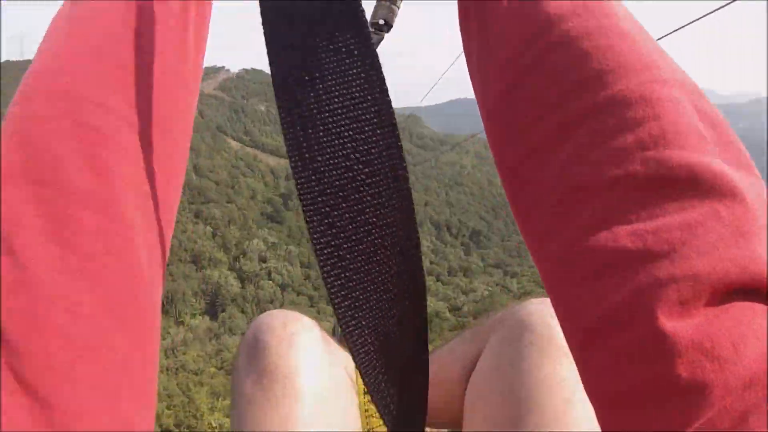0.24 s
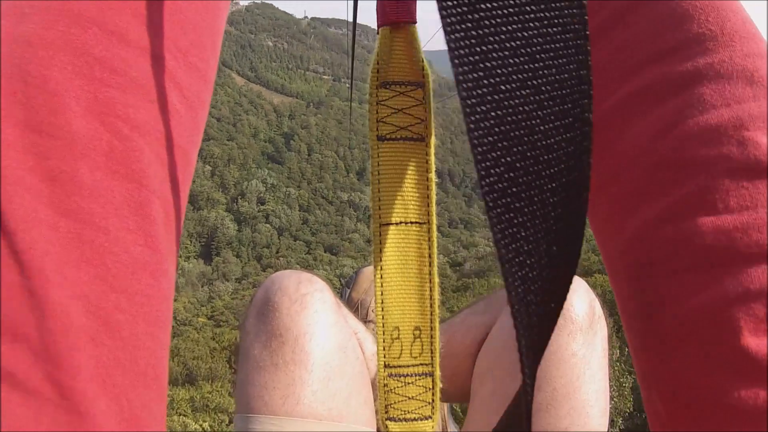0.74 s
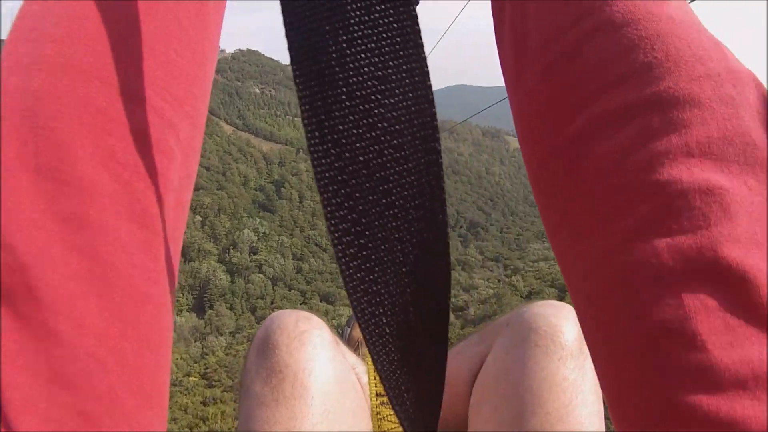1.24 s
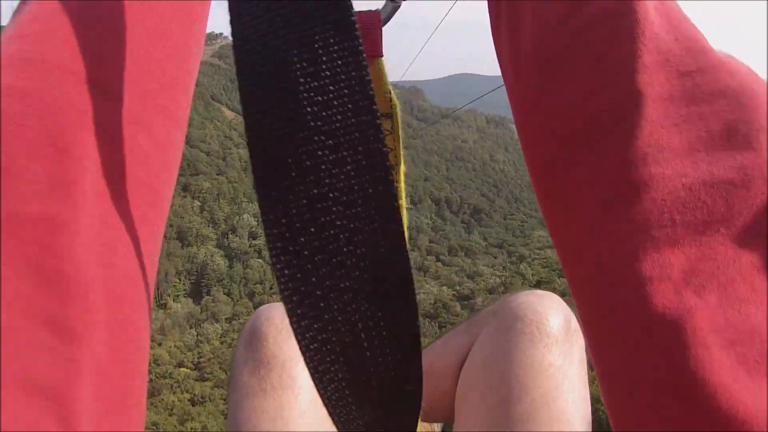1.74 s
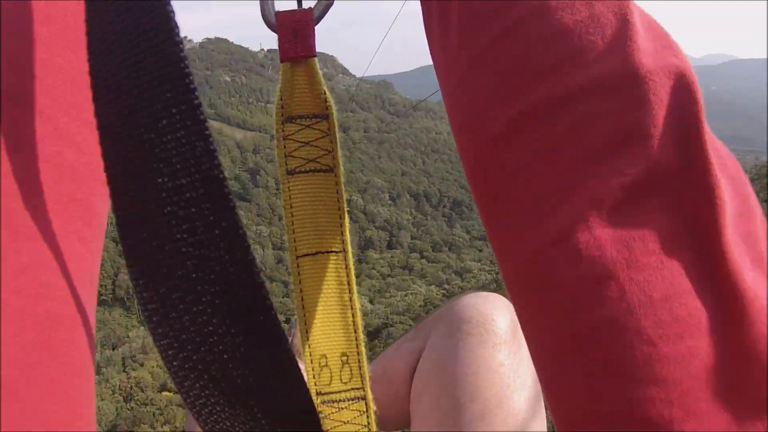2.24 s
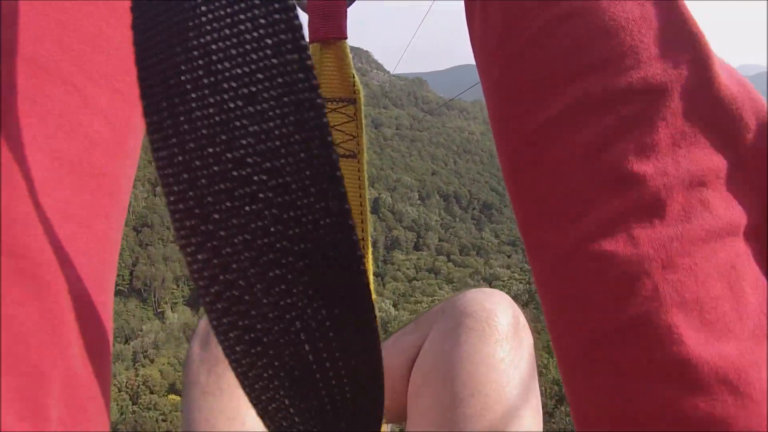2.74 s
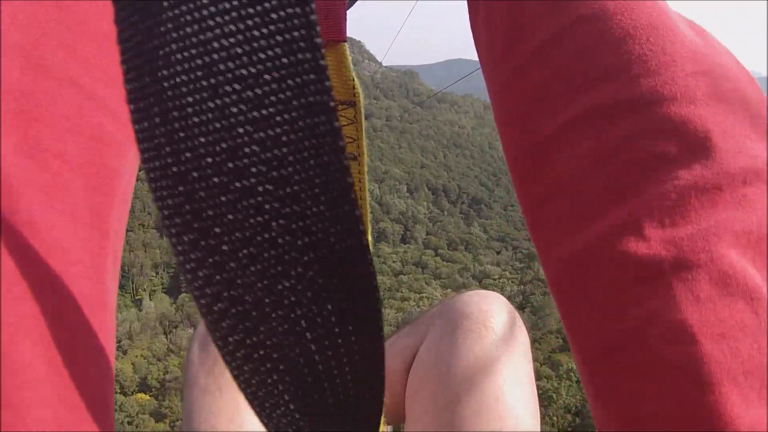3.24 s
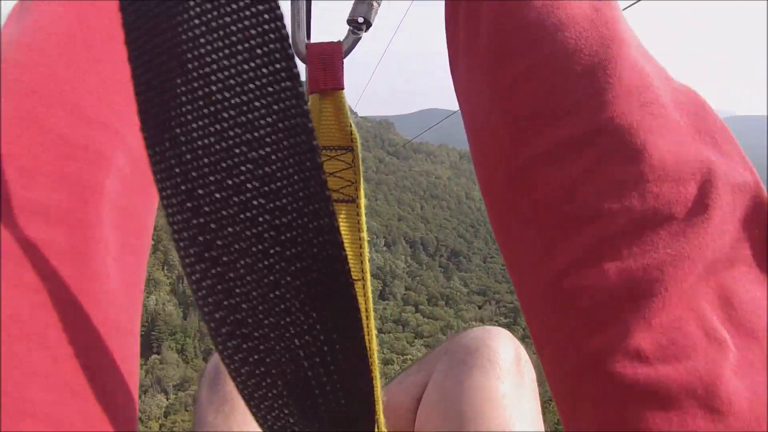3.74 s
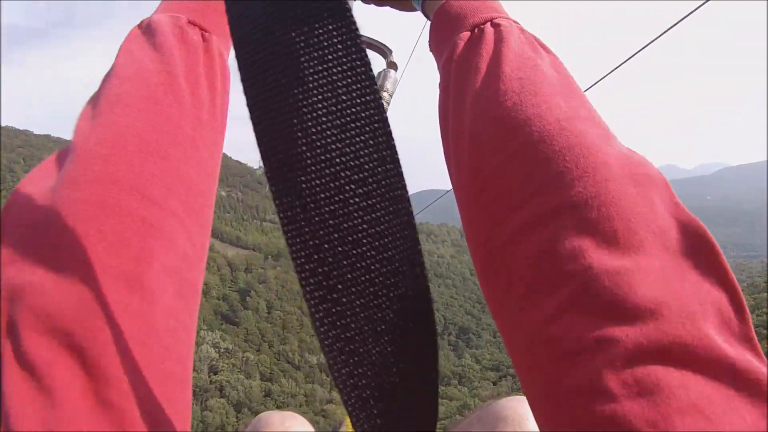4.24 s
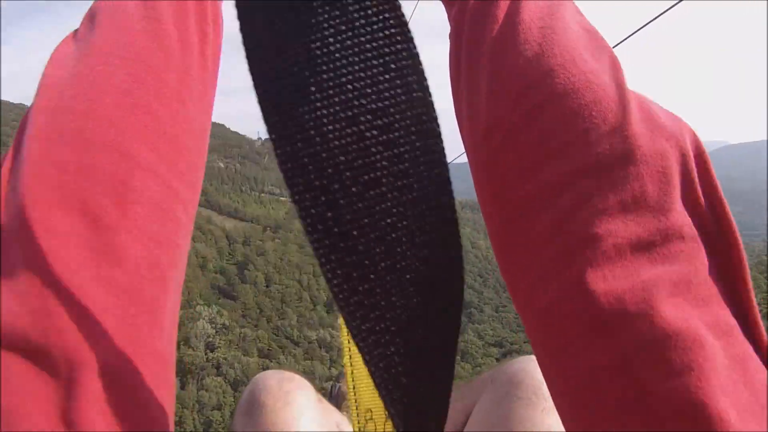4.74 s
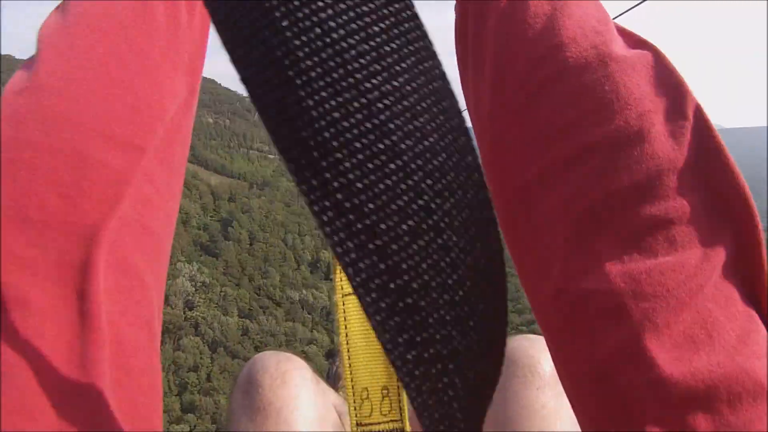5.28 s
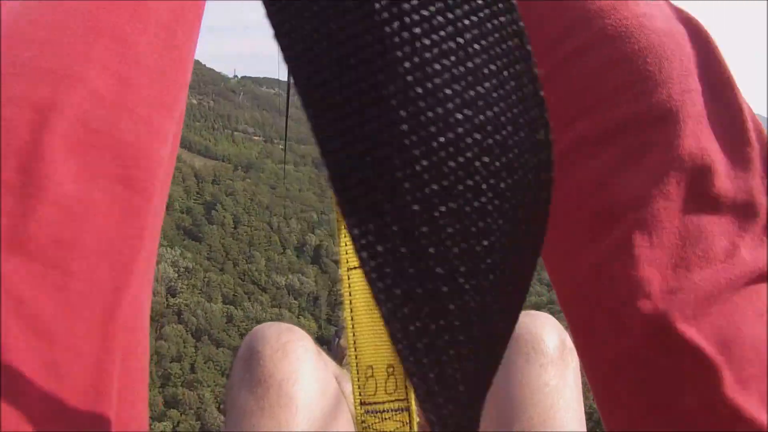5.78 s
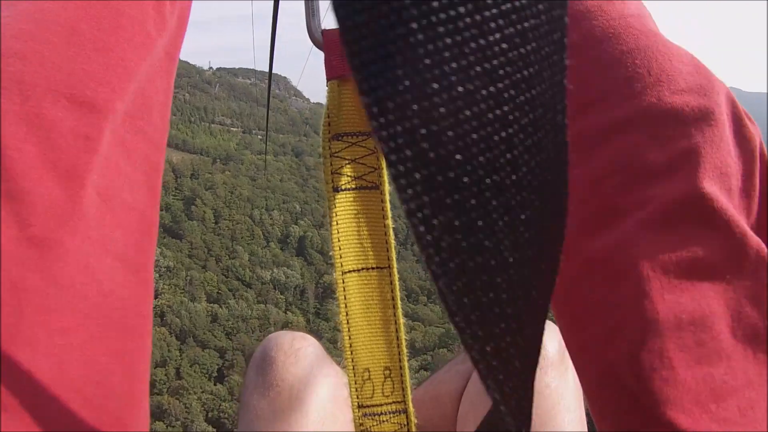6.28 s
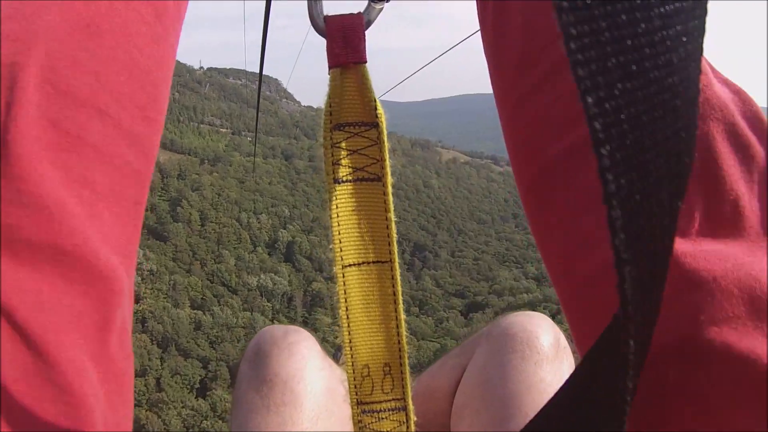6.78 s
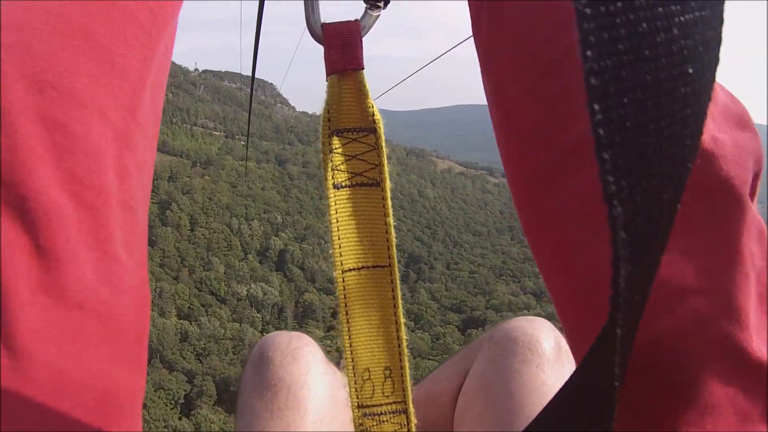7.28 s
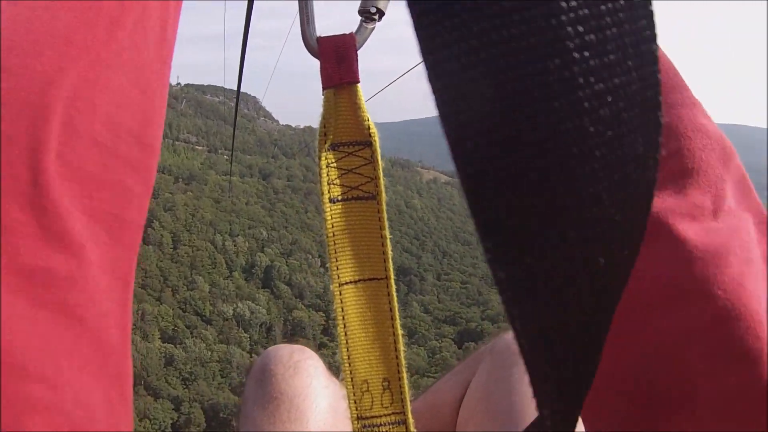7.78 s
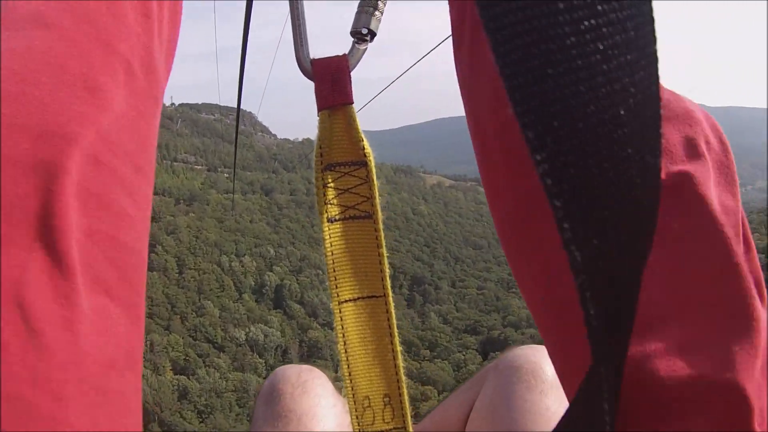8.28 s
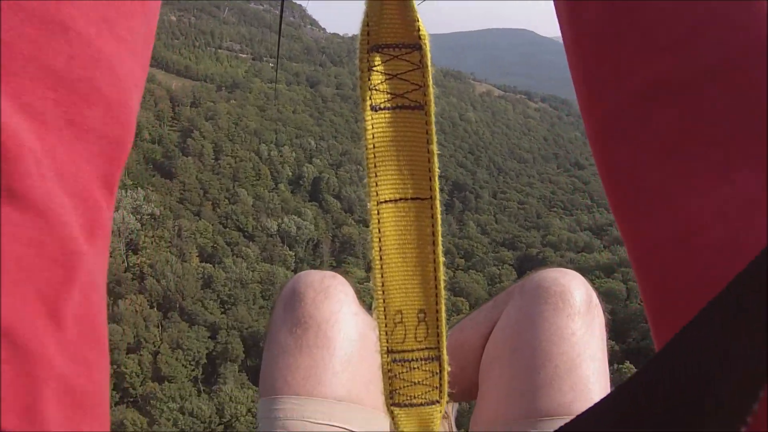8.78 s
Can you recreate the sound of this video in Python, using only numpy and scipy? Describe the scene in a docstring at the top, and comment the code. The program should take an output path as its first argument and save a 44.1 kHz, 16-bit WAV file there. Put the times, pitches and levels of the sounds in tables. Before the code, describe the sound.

Close to the rider, a zipline trolley runs down a stranded steel cable in open air. A rough metallic whine climbs smoothly as it gains speed, wrapped in bright, gritty wheel hiss. Wind begins faintly, then builds into low thumps, rushing air and brief hollow hoots on the microphone. The ride continues to the end without stopping.

```python
"""Zipline ride

A zipline trolley gathers speed down a stranded steel cable, heard in mono by a microphone on the rider.
The wheels drum over the strands, sines whose pitch follows the speed: a rising whine.
They also grind on the wires, noise and fuzzy tones that ring the trolley's fixed resonances.
The headwind, coloured noise on one strength curve, buffets the microphone and hoots in a hollow."""
import sys
import numpy as np
from scipy.fft import rfft, irfft, next_fast_len
from scipy.io import wavfile
from scipy.ndimage import map_coordinates

SR = 44100
rng = np.random.default_rng(int(sys.argv[2]) if len(sys.argv) > 2 else 0)


def output_pcm(signal):
    """Save a mono or channel-first signal as 16-bit PCM at the path in sys.argv[1].

    Samples are clipped to [-1, 1] before scaling.
    """
    pcm = np.clip(np.atleast_2d(signal).T, -1, 1) * 32767
    wavfile.write(sys.argv[1], SR, np.round(pcm).astype(np.int16))


N = 397782
STRANDS_PER_TURN = 6

# In all resonance tables the width is taken at half amplitude, and levels weigh the resonances.
# Resonances of the trolley frame. Each row: centre in Hz, width in Hz, level in dB.
FRAME = [(1606.5, 91, -8), (1670, 61, -6), (1791, 103, -5), (1895, 114, -1.5), (2097, 110, -22),
         (2424, 157, -20.5), (2863, 254, -21.5), (3114, 240, -23.5)]
# Resonances of the wheels. Each row: centre in Hz, width in Hz, level in dB.
WHEELS = [(3903, 114, -6.5), (4050, 210, -7), (4240, 230, -9), (4560, 215, -6), (4920, 290, -2),
          (5205, 250, -7.5)]
# Resonances of the wheel rims. Each row: centre in Hz, width in Hz, level in dB.
RIMS = [(5710, 200, -6), (5920, 160, -8), (6268, 300, -1.5), (6470, 200, -5.5)]
# Resonances of the wire contact. Each row: centre in Hz, width in Hz, level in dB.
CONTACT = [(7064, 330, 3), (7410, 460, 1), (7930, 520, -8), (8240, 290, -12)]


def amp(db):
    """Decibels to gain."""
    return 10 ** (np.asarray(db) / 20)


def unit(x):
    """Scale to rms 1."""
    return x / np.sqrt(np.mean(x ** 2) + 1e-20)


def curve(rows):
    """Straight lines through (seconds, value) rows, one value per sample."""
    s, values = np.transpose(rows)
    return np.interp(np.arange(N) / SR, s, values)


def swells(rows):
    """The dB curve of bell-shaped swells (centre s, half length s to 1/e of the dB, peak dB)."""
    t = np.arange(N) / SR
    return sum(db * np.exp(-((t - s) / length) ** 2) for s, length, db in rows)


def follow(control_db, grows):
    """A level that swings grows times as far as its control, about the same mean."""
    mean_db = control_db.mean()
    return mean_db + grows * (control_db - mean_db)


def wobble(rate):
    """A smooth random curve, rate knots a second."""
    knots = rng.standard_normal(int(N * rate / SR) + 4)
    return map_coordinates(knots, [np.arange(N) * rate / SR])


def filtered(x, response):
    """x times a response of frequency, padded so that the filter's tail does not wrap round."""
    m = next_fast_len(N + SR // 2)
    spectrum = rfft(x, m) * response(np.fft.rfftfreq(m, 1 / SR))
    return irfft(spectrum, m)[..., :N]


def slope(points):
    """The response through (Hz, dB) points on a log axis."""
    f, db = np.transpose(points)
    return lambda hz: amp(np.interp(np.log(hz + 1), np.log(f + 1), db))


def body(modes):
    """The response of steep-sided resonances whose powers add."""
    def response(hz):
        power = 0
        for centre, width, db in modes:
            power = power + (amp(db) / (1 + (2 * (hz - centre) / width) ** 2)) ** 2
        return np.sqrt(power)
    return response


def noise(response):
    """Noise of rms 1 with the given colour."""
    return unit(filtered(rng.standard_normal(N), response))


def tone(cycles, blur, blur_rate, flutter_db):
    """A sine of rms 1 whose phase and strength wander with the uneven lay of the cable."""
    phase = 2 * np.pi * cycles + blur * wobble(blur_rate)
    return unit(amp(flutter_db * wobble(14)) * np.sin(phase))


def steadiness():
    """A gain of 1 that sags for an instant at each lull, when the hiss thins."""
    # Each row: centre in seconds, full depth in dB; the layers take it in different measure.
    lulls = [(1.265, -11), (1.76, -9), (2.543, -12), (3.887, -11), (4.228, -14), (4.466, -12), (4.569, -16),
             (4.634, -15), (4.719, -16), (4.804, -15), (5.231, -14), (7.17, -13), (7.3, -9), (8.706, -9)]
    half_length_s = 0.0085
    return amp(swells([(s, half_length_s, db) for s, db in lulls]))


def buffeting(wind_db, gust_db, eddies):
    """Low thumps as eddies hit the microphone."""
    # Colour of the thumps. Each row: frequency in Hz, relative level in dB per Hz.
    buffet_colour = [(10, -36), (25, -14), (38, 1), (50, 2.5), (70, -1.5), (100, -8), (150, -17.5),
                     (300, -42), (600, -90)]
    level_db = follow(wind_db, grows=0.82) + 3.5 + gust_db + 0.81 * eddies
    return amp(level_db) * noise(slope(buffet_colour))


def air_rush(wind_db, gust_db, eddies):
    """Turbulent air rushes around the microphone, with a quicker flutter of its own."""
    # Colour of the rush. Each row: frequency in Hz, relative level in dB per Hz.
    rush_colour = [(50, -27), (110, -0.5), (150, 2), (220, -1), (330, -7), (500, -6), (650, -17.5),
                   (950, -13), (1200, -11.5), (2000, -7), (4000, -52), (15000, -53)]
    level_db = follow(wind_db, grows=1.0) - 0.05 + 0.22 * gust_db
    return amp(level_db + 0.88 * eddies + 1.24 * wobble(70)) * noise(slope(rush_colour))


def hollow_hoot(wind_db, eddies):
    """Wind blowing across a hollow sounds its resonance in short puffs, louder faster than the wind."""
    # The hollow's resonances. Each row: centre in Hz, width in Hz, level in dB.
    hollow = [(793, 59, 3), (801, 308, -8)]
    # Swells and fades as the wind's angle on the hollow changes.
    # Each row: centre in seconds, half length in seconds, change in dB.
    hoot_swells = [(2.15, 0.34, 4), (4.05, 0.14, 2.5), (4.45, 0.15, -6), (5.35, 0.6, -6.5), (6.1, 0.2, 3.0),
                   (8.25, 0.35, 1)]
    level_db = follow(wind_db, grows=1.36) + 1.5 + swells(hoot_swells)
    return amp(level_db + 1.4 * eddies + 1.8 * wobble(50)) * noise(body(hollow))


def wind(steady):
    """One wind strength and one set of eddies drive the buffeting, the rush and the hoot."""
    # Strength of the headwind, before each layer's own offset. Each row: time in seconds, strength in dB.
    strength = [(0.0, -49.5), (0.4, -54), (0.6, -45.5), (2.6, -32.5), (2.8, -34.5), (3.6, -32.0),
                (3.8, -36), (4.8, -37), (5.0, -34), (5.8, -29.5), (6.6, -36), (7.0, -30), (7.6, -34.5),
                (8.0, -32.0), (8.2, -35.5), (9.0, -30.5)]
    # Gusts and slack spells at the microphone, in full on the buffeting and in part on the rush.
    # Each row: centre in seconds, half length in seconds, change in dB.
    gusts = [(1.35, 0.25, 4.0), (3.45, 0.22, -4), (4.95, 0.17, 2.5), (8.75, 0.34, 6)]
    wind_db, gust_db, eddies = curve(strength), swells(gusts), wobble(22)
    buffet = buffeting(wind_db, gust_db, eddies)
    rush = steady * air_rush(wind_db, gust_db, eddies)
    hoot = np.sqrt(steady) * hollow_hoot(wind_db, eddies)
    return buffet + rush + hoot


def frame_ring():
    """The rough steel contact rings the trolley frame."""
    # Level of the ring, before its offset. Each row: time in seconds, level in dB.
    ring_level = [(0.0, -24.5), (1.0, -23.5), (2.2, -26), (2.6, -24.5), (4.2, -26.5), (4.6, -30),
                  (5.4, -26), (7.0, -23.0), (7.2, -27.5), (7.8, -24), (8.0, -25), (8.2, -24), (9.0, -24)]
    return amp(curve(ring_level) + 6.5 + 0.34 * wobble(14)) * noise(body(FRAME))


def wheel_hiss(grind_db, rub_db):
    """The contact excites the wheels, and their rims ring harder when the cable rubs against them."""
    # Level of the wheels' hiss, before its offset. Each row: time in seconds, level in dB.
    hiss_level = [(0.0, -19), (0.8, -22.0), (1.4, -20), (1.8, -23.0), (2.6, -22.5), (3.8, -25.0),
                  (4.2, -22), (5.2, -23.5), (6.0, -23.0), (7.2, -24.0), (8.0, -22.0), (9.0, -26.5)]
    wheel = amp(curve(hiss_level) - 0.32) * noise(body(WHEELS))
    rim = amp(follow(grind_db, grows=0.6) + rub_db + 1.5) * noise(body(RIMS))
    return wheel + rim


def wire_song(turns):
    """Single wires passing under the wheel sing as fuzzy tones, high above the whine."""
    # Each row: cycles per wheel turn, level in dB before the resonances.
    wire_orders = [(39.9, -29.5), (45.9, -32.5)]
    wires = sum(amp(db) * tone(k * turns, blur=0.58, blur_rate=140, flutter_db=3.5) for k, db in wire_orders)
    wheels_and_rims = body([*WHEELS, *RIMS])
    return filtered(wires, lambda hz: wheels_and_rims(hz) + amp(-7.5) * body(CONTACT)(hz))


def contact_sizzle(grind_db):
    """Grinding wires ring the resonances of the contact itself."""
    return amp(grind_db - 1.54) * noise(body(CONTACT))


def scrape(grind_db, rub_db):
    """Dry grit between the resonances, and a fizz from the highest ones; both swing less than the grind."""
    # Colour of the dry scraping. Each row: frequency in Hz, relative level in dB per Hz.
    grit_colour = [(600, -35), (1100, -20), (1400, -21), (2050, 4.5), (2450, -2.5), (2620, -3), (3000, 0),
                   (3500, 0.5), (5500, -0.5), (8000, -0.5), (12000, -39)]
    # Highest resonances of the steel parts. Each row: centre in Hz, width in Hz, level in dB.
    fizz_modes = [(8880, 120, 2.5), (9600, 780, -3.5), (10420, 860, 1), (11060, 440, -3.5),
                  (12100, 700, -7.5), (12650, 500, -10), (13400, 650, -6.5), (14650, 800, -14.5)]
    grit = amp(follow(grind_db, grows=0.26) + 0.27 * rub_db - 2.5) * noise(slope(grit_colour))
    fizz = amp(follow(grind_db, grows=0.23) + 0.8 * rub_db - 9.5) * noise(body(fizz_modes))
    return grit + fizz


def rolling(turns, steady):
    """The wheels grind along the wires, pressing unevenly once a turn; resonances ring on through lulls."""
    # How hard the wheels grind, before each layer's offset. Each row: time in seconds, strength in dB.
    grind = [(0.0, -33), (0.6, -24), (1.8, -28.5), (2.4, -25.5), (2.8, -28.5), (3.0, -28.5), (3.8, -31),
             (4.4, -32), (4.6, -36.5), (5.0, -26.5), (5.2, -32), (5.4, -26), (7.2, -26.0), (7.8, -22.5),
             (8.4, -26.5), (9.0, -24.0)]
    # The cable rubs against a wheel's rim, in full on the rims and in part on the scraping.
    # Each row: centre in seconds, half length in seconds, swell in dB.
    rubs = [(2.53, 0.21, 5.0), (3.08, 0.13, 6.5), (3.5, 0.21, 2.5), (4.95, 0.22, 1.5), (7.75, 0.2, 2)]
    grind_db, rub_db = curve(grind), swells(rubs)
    load_db = 0.42 * wobble(45) + 0.5 * np.sin(2 * np.pi * turns)
    roughness = amp(0.46 * wobble(12) + 0.77 * wobble(150))
    ring = steady ** 0.15 * frame_ring()
    resonant = wheel_hiss(grind_db, rub_db) + wire_song(turns) + roughness * contact_sizzle(grind_db)
    scraping = steady * roughness * scrape(grind_db, rub_db)
    return amp(load_db) * (ring + steady ** 0.057 * resonant + scraping)


def strand_rate():
    """Strands passed per second: gravity speeds the trolley up, ever less as drag grows."""
    start_hz, gain_hz_per_s = 623.0, 85.6
    drag_per_s = 0.0868  # share of the initial gain that drag takes each second
    t = np.arange(N) / SR
    return start_hz + gain_hz_per_s * t * (1 - drag_per_s * t / 2)


def wheel_turns():
    """Turns made so far; the wheel's speed trembles slightly on the cable."""
    trembling_rate = strand_rate() * (1 + 0.000814 * wobble(25))
    return np.cumsum(trembling_rate) / SR / STRANDS_PER_TURN


def strand_tones(turns):
    """Each strand bumps the wheel: three harmonics that swell as they cross narrow resonances."""
    # Resonances of the loaded cable and trolley, for the first two harmonics.
    # Each row: centre in Hz, width in Hz, level in dB.
    swept = [(680, 43, -48.5), (800, 24, -35), (1041.4, 55, -41), (1260, 48, -46.5), (1532, 98, -28.5),
             (1670, 44, -25.5), (1831, 87, -14.5), (1892, 70, -15.5), (1950, 80, -20), (2005, 30, -22.5),
             (2154, 47, -32.5)]
    # Resonances that the third harmonic crosses. Each row: centre in Hz, width in Hz, level in dB.
    swept_high = [(2828, 66, -37.5), (3194, 70, -38)]
    strands, strand_hz = STRANDS_PER_TURN * turns, strand_rate()
    hum = body(swept)(strand_hz) * tone(strands, blur=0.14, blur_rate=28, flutter_db=1.5)
    main = body(swept)(2 * strand_hz) * tone(2 * strands, blur=0.33, blur_rate=45, flutter_db=1.0)
    high = body(swept_high)(3 * strand_hz) * tone(3 * strands, blur=0.68, blur_rate=45, flutter_db=3.0)
    return hum + main + high


def side_tones(turns):
    """The wheel's slight runout adds tones beside the strand tones, heard through frame and wheels."""
    # Each row: cycles per wheel turn, level in dB before the resonances.
    wheel_orders = [(11, -21), (13, -20.5), (14, -24.5), (17, -25.5), (18, -21.5), (19, -22), (23, -20),
                    (24, -19), (25, -23)]
    sides = sum(amp(db) * tone(k * turns, blur=0.16, blur_rate=30, flutter_db=4.0) for k, db in wheel_orders)
    return filtered(sides, lambda hz: body(FRAME)(hz) + amp(-15) * body(WHEELS)(hz))


def whine(turns):
    """The wheels drum over the strands: strand tones and side tones climb with the speed."""
    return strand_tones(turns) + side_tones(turns)


def scene():
    """Wind and trolley in open air, alike in both channels."""
    turns, steady = wheel_turns(), steadiness()
    mono = wind(steady) + rolling(turns, steady) + whine(turns)
    return np.tile(mono, (2, 1))


def record(dry):
    """The tallest peaks are rounded off softly, then everything above the band limit is cut."""
    ceiling, top_hz = 0.85, 15300
    rounded = dry / (1 + np.abs(dry / ceiling) ** 8) ** (1 / 8)
    return filtered(rounded, lambda hz: hz < top_hz)


dry = scene()
out = record(dry)
output_pcm(out)
```